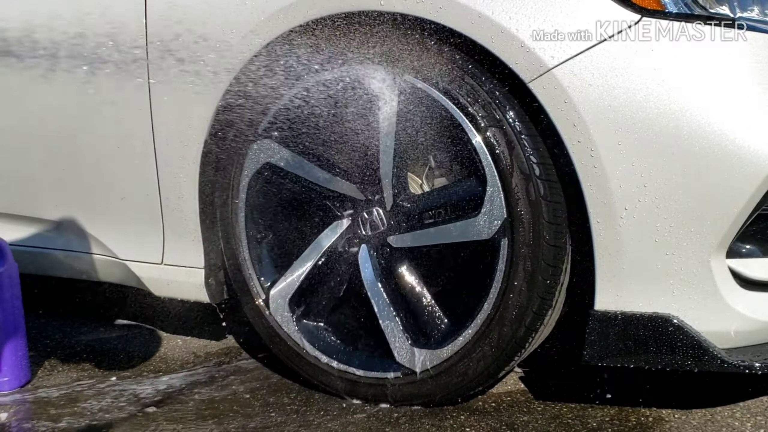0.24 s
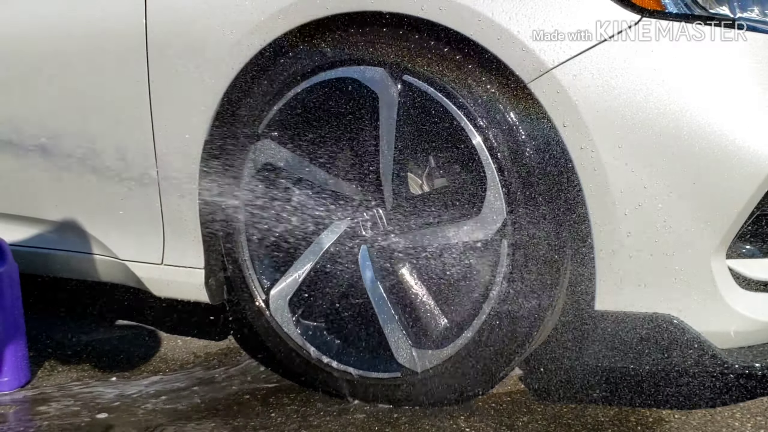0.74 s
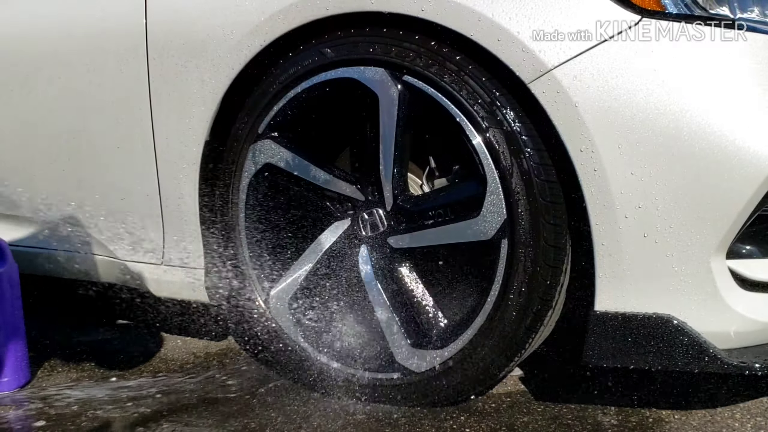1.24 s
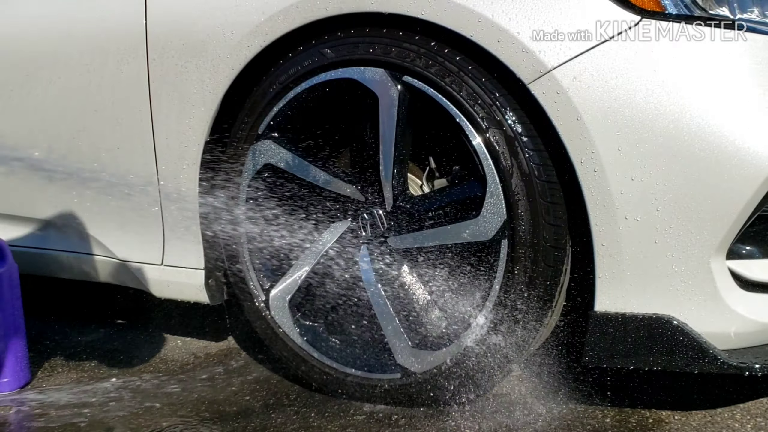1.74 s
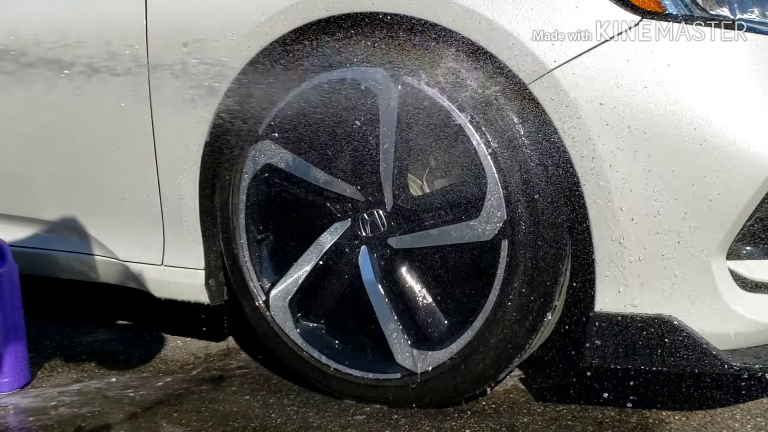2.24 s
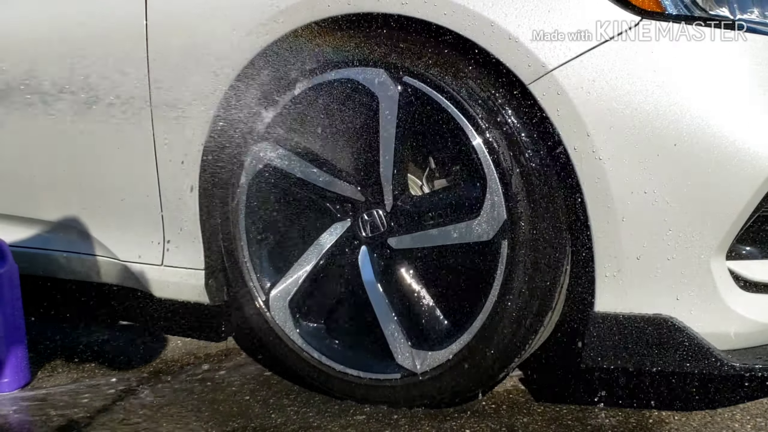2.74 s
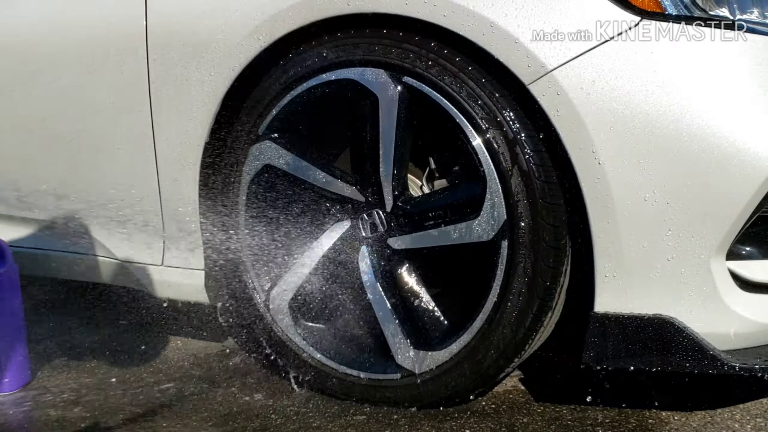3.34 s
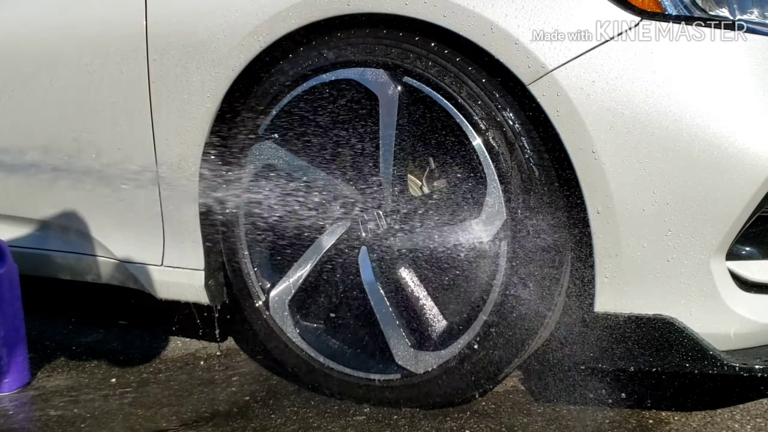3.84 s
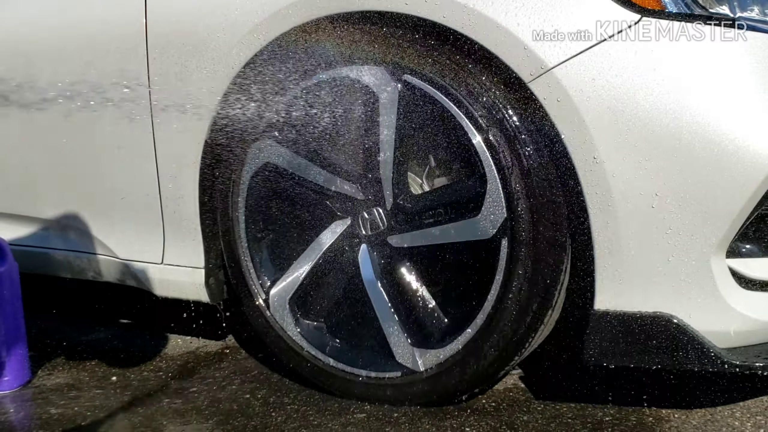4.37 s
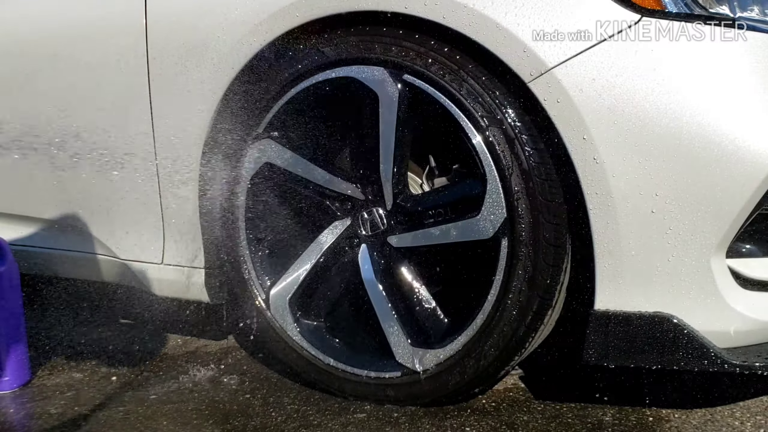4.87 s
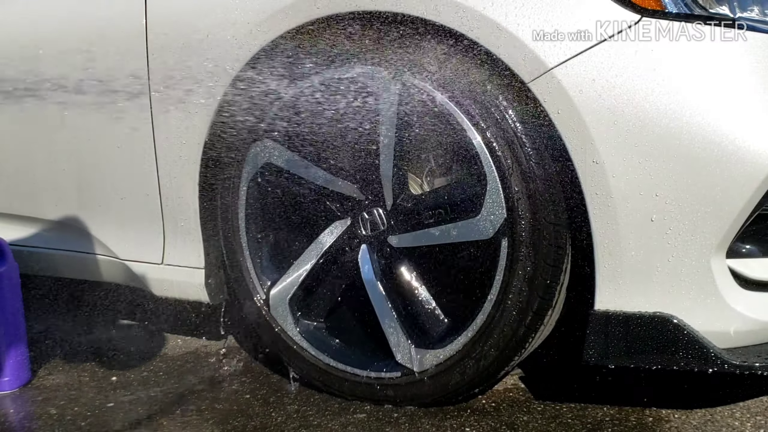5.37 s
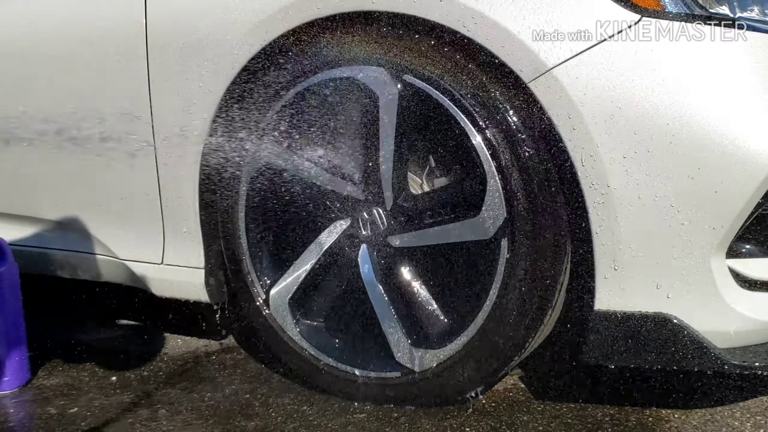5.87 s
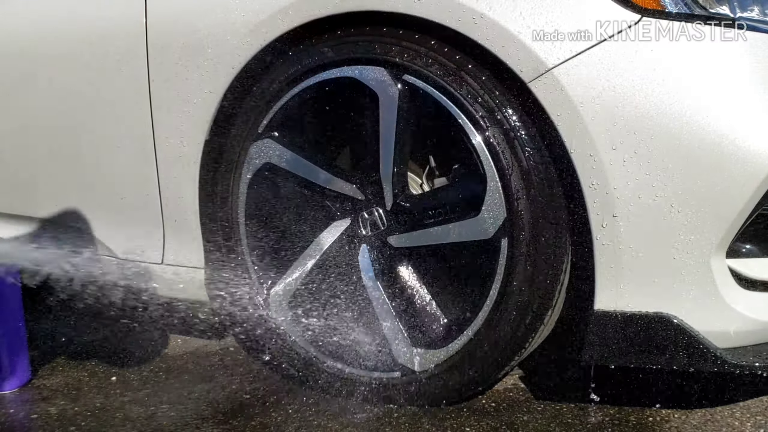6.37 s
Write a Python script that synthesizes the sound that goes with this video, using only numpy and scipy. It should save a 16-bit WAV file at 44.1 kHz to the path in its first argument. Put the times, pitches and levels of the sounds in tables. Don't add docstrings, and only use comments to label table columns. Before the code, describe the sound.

A garden hose hisses steadily over a car wheel outdoors, its nozzle spitting loud ragged bursts with thuds until about halfway, then just bright spray.

```python
import sys
import numpy as np
from scipy import signal
from scipy.fft import rfft, irfft, next_fast_len
from scipy.io import wavfile
from scipy.ndimage import uniform_filter1d, map_coordinates

SR = 44100
rng = np.random.default_rng(int(sys.argv[2]) if len(sys.argv) > 2 else 0)


def unload_wav(signal):
    wavfile.write(
        sys.argv[1],
        SR,
        np.round(np.clip(np.atleast_2d(signal).T, -1, 1) * 32767).astype(np.int16),
    )


def linear_from_db(decibels):
    return 10 ** (np.asarray(decibels, float) / 20)


N = 291497
SIZE = next_fast_len(N)
FREQ_HZ = np.fft.rfftfreq(SIZE, 1 / SR) + 1
T_S = np.arange(N) / SR

# t/s, spray level/dB, bare metal re spray/dB
JET = [(0, -36.5, -16.5), (.3, -38.5, -13), (.95, -40, -13), (1.16, -37.5, -13), (1.3, -40, -11.5),
       (1.5, -37.5, -16.5), (2.1, -37.5, -10.5), (2.5, -38, -13.5), (3.1, -39.5, -12.5), (3.36, -41.5, -12),
       (3.6, -37, -13), (3.82, -41, -11.5), (4.0, -39, -12.5), (4.4, -40.5, -12.5), (4.75, -37, -13),
       (5.1, -33, -16), (5.75, -36.5, -10.5), (6.61, -38.5, -11.5)]
# t/s, right port delay/samples
AIM = [(.15, 3.2), (.3, 0), (.65, -2), (1, 0), (1.65, .8), (2.0, -4), (2.4, -.2), (2.8, 4), (3.2, 4.5),
       (3.55, .2), (3.95, -3), (4.3, -.3), (4.75, 4.5), (5.08, 4.5), (5.35, 0), (5.8, -3.2), (6.07, 3.8),
       (6.4, 1)]
# t/s, drumming level/dB, half length/s, hiss lost/dB
CROSSINGS = [(0.135, -46, 0.038, -1.5), (0.5, -52.5, 0.058, 2), (0.592, -45, 0.04, -0.5),
             (0.73, -54.5, 0.071, -1.5), (0.88, -54, 0.059, 1), (1.935, -59, 0.053, 0),
             (2.07, -52.5, 0.2, -1), (2.743, -56, 0.023, -2), (3.02, -56.5, 0.047, 1.5),
             (3.19, -54.5, 0.063, -1), (3.493, -58, 0.04, 1.5), (3.93, -53.5, 0.034, 0.5),
             (4.208, -43.5, 0.056, 0.5), (4.565, -47, 0.074, 2.5), (4.985, -51, 0.1, 5.5),
             (5.22, -53.5, 0.087, 4), (5.613, -51.5, 0.27, -2), (5.883, -42.5, 0.018, 2),
             (5.994, -46, .03, -2), (6.22, -56, 0.23, -3), (6.518, -56, 0.08, -1.5)]
# t/s, hiss gained/dB, half length/s
SURGES = [
    (1.16, 0.5, 0.033),
    (1.477, 1.5, 0.042),
    (2.5, 1.5, 0.033),
    (3.963, 2, 0.054),
    (4.274, 4.5, 0.046),
    (4.632, 2.5, 0.13),
    (5.08, 2.5, 0.038),
    (5.752, 2.5, 0.039),
    (6.273, 1, 0.12),
    (6.52, 3.5, 0.031),
]
# f/Hz, density/dB
HISS_SPECTRUM = [(5400, -24), (5900, -3), (7000, -4.5), (7830, -2.5), (9200, -3), (12100, 3.5),
                 (14800, 2.5), (15400, 2), (17000, -0.5)]
# f/Hz, density/dB
RIM_SPECTRUM = [(1700, -8.5), (2300, -4.5), (2750, -1), (3300, -0.5), (4200, 0), (5000, -1), (5700, 0.5),
                (6300, -7.5)]
# f/Hz, density/dB
TYRE_SPECTRUM = [(120, -34), (200, -10.5), (567, -2), (720, -3), (843, -2), (977, -3), (1310, 1),
                 (1610, -0.5), (2090, -3.5), (3000, -8), (3900, -38), (6600, -120)]
TYRE_IDLE_DB, PAN_DB_PER_SAMPLE, SURGE_DB = -58.5, 0.3, 1.56

# t/s, peak/dB, open time/s, body re peak/dB, thud/dB
AIR_POCKETS = [
    (0, -28.5, 0.0041, 8.5, -52),
    (0.122, -16, 0.014, 0, -25.5),
    (1.353, -15, 0.045, 1.5, -27.5),
    (1.62, -16.5, 0.009, 0, -31.5),
    (1.956, -18, 0.0078, 3.5, -35),
    (2.147, -17.5, 0.011, 3, -48),
    (2.259, -18, 0.019, 3, -34),
    (2.57, -18, 0.0063, -1.5, -29),
    (2.812, -19.5, 0.0087, -0.5, -30.5),
    (3.245, -19, 0.0077, -2, -37),
]
# f/Hz, density/dB
SPIT_SPECTRUM = [(1290, -38), (2200, -14), (2550, -13.5), (3020, -10.5), (3920, -10), (5010, -7.5),
                 (5430, -12), (6040, -4), (6770, -8.5), (8030, -4), (10000, -4.5), (12100, 1.5),
                 (15400, -5.5)]
# f/Hz, density/dB
BODY_SPECTRUM = [(250, -12), (600, -1), (1000, -2), (1400, 0), (1900, -4.5), (2400, -8), (3000, 1)]
NOZZLE_LAG_SAMPLES, SPLAT_DB, SAG_DB_PER_S = 12.4, -26.5, 38

# t/s, peak/dB, half length/s
GUSTS = [(.27, -54, .05), (.59, -47.5, 0.082), (.92, -48, 0.2), (1.5, -57, 0.17), (2.0, -52, .08),
         (2.25, -54, 0.083), (3.9, -52.5, 0.1), (5.0, -51, 0.12), (5.42, -47, 0.18), (6.15, -49.5, 0.29),
         (6.34, -43.5, 0.084), (6.6, -48, .06)]
# f/Hz, density/dB
WIND_SPECTRUM = [(28, -14), (42, -4.5), (60, 2.5), (85, -2), (120, -7.5), (200, -20.5)]
# f/Hz, density/dB
TOWN_SPECTRUM = [(15, -41), (25, -24), (65, -9), (102, -3), (139, -3.5), (177, -2.5), (270, -8.5),
                 (328, -13.5), (386, -10), (461, -14.5), (1200, -13), (1560, -41), (2640, -120)]
# f/Hz, wander/Hz
MOTOR_LINES = [(130, 2.67), (115.5, 4)]
# t/s, upper line/dB, lower line/dB
MOTOR_LOAD = [(0, -57.5, -56), (.6, -55.5, -62), (.85, -52, -50.5), (1.6, -66, -52.5), (2.0, -52.5, -53.5),
              (2.6, -58, -58), (3.3, -59, -67), (4.9, -54, -79), (6.61, -65, -58.5)]
CALM_DB, TOWN_DB = -56, -55

# t/s, peak/dB
SLUGS = [
    (0.284, -35),
    (1.477, -31.5),
    (1.7, -35),
    (2.033, -31),
    (2.048, -36),
    (2.227, -31),
    (2.346, -31.5),
    (2.77, -31.5),
    (2.88, -32),
]
# t/s, peak/dB, f/Hz
DROPS = [(1.721, -26.5, 4850), (2.126, -41, 4490), (2.345, -39, 4700), (4.137, -37, 1380),
         (4.175, -35, 1280), (0.742, -42, 665), (5.236, -41, 980), (6.003, -38, 1090), (4.533, -29.5, 2350),
         (4.582, -33, 1030), (5.862, -34, 1390)]
# t/s, peak/dB, f/Hz
PUFFS = [
    (0.766, -31.5, 188),
    (4.335, -42, 61.9),
    (6.283, -27, 66.4),
    (6.353, -38, 95),
    (6.379, -38, 56.5),
]

# f/Hz, left minus right/dB
PORT_TILT = [(100, -0.5), (300, 0), (1000, 0.5), (4000, 0.5), (5300, -1.5), (6200, 0.5), (8000, 11.5),
             (9500, -1.5), (12000, 3.5), (15000, 1.5)]
# f/Hz, shared power/1
PORT_SHARE = [(60, 0.35), (150, 0.88), (400, 0.68), (900, 0.42), (2200, 0.23), (3300, 0.43), (5600, 0.39),
              (7000, 0.2), (15000, 0.17)]
TOP_HZ = 15760


def table(rows):
    hz, value = np.transpose(rows)
    return np.interp(np.log(FREQ_HZ), np.log(hz), value)


def curves(rows):
    t_s, *columns = np.transpose(rows)
    return [np.interp(T_S, t_s, column) for column in columns]


def shut(rows):
    below_oct = np.maximum(np.log2(rows[0][0] / FREQ_HZ), 0)
    above_oct = np.maximum(np.log2(FREQ_HZ / rows[-1][0]), 0)
    return linear_from_db(table(rows) - 24 * (below_oct + above_oct))


def unit(x):
    return x / np.sqrt(np.mean(x ** 2))


def walk(rate_hz):
    hold = int(SR / rate_hz)
    steps = np.repeat(rng.standard_normal(N // hold + 1), hold)
    return 0.74 * uniform_filter1d(uniform_filter1d(steps, hold), hold)[:N]


def bell(t_s, half_s):
    return np.exp(-((T_S - t_s) / half_s) ** 2)


def swells(rows, idle_db):
    power = linear_from_db(2 * idle_db) + sum(linear_from_db(2 * row[1]) * bell(row[0], row[2]) for row in rows)
    return np.sqrt(power)


def droplets(spread_db, lag, focus):
    size_db = spread_db * np.minimum(rng.exponential(size=(3, N)), 6)
    common, own_left, own_right = rng.standard_normal((3, N)) * linear_from_db(size_db)
    late = map_coordinates(common, [np.arange(N) - lag], order=3, mode="nearest")
    near, far, left, right = (rfft(unit(h), SIZE) for h in (common, late, own_left, own_right))
    share = np.clip(table(PORT_SHARE) * focus, 0, .95)
    return np.sqrt(share) * np.array([near, far]) + np.sqrt(1 - share) * np.array([left, right])


def patter(rows, spread_db, lag, focus, quick_db, rate_hz):
    spectrum = droplets(spread_db, lag, focus) * shut(rows)
    all_db = quick_db * walk(rate_hz)
    out = 0
    octaves = np.arange(np.log2(rows[-1][0] / rows[0][0]) + 1)
    for hz in rows[0][0] * 2. ** octaves:
        band = np.cos(np.pi / 2 * np.clip(np.log2(FREQ_HZ / hz), -1, 1)) ** 2
        flicker_db = all_db + 1.43 * quick_db * walk(1.5 * rate_hz)
        out = out + irfft(spectrum * band, SIZE)[:, :N] * linear_from_db(flicker_db)
    return unit(out)


def spray():
    jet_db, metal_db = curves(JET)
    lag, = curves(AIM)
    jet_db = jet_db + SURGE_DB * walk(14)
    jet_db = jet_db + sum(gain_db * bell(t_s, half_s) for t_s, gain_db, half_s in SURGES)
    hiss_db = jet_db - sum(lost_db * bell(t_s, half_s) for t_s, _, half_s, lost_db in CROSSINGS)
    hiss = patter(HISS_SPECTRUM, 2.8, lag, 1, 1.6, 55) * linear_from_db(hiss_db + 2.5)
    rim = patter(RIM_SPECTRUM, 2.4, lag, 1.3, 1.5, 35) * linear_from_db(jet_db + metal_db + 5)
    tyre = patter(TYRE_SPECTRUM, 3.3, lag, 1.2, 2.2, 60)
    tyre = tyre * swells(CROSSINGS, TYRE_IDLE_DB) * linear_from_db(1.5)
    pan_db = PAN_DB_PER_SAMPLE * lag
    return (hiss + rim) * linear_from_db(np.array([pan_db, -pan_db]) / 2) + tyre


def spits(rise_s=0.0041, close_s=0.008, hang_s=0.048, body_db=-20.5):
    air, body, splat, thud = np.zeros((4, N))
    for t_s, peak_db, open_s, tone_db, thud_db in AIR_POCKETS:
        k = slice(max(int((t_s - .04) * SR), 0), int((t_s + .25) * SR))
        t = T_S[k] - t_s
        since = np.maximum(t, 0)
        rise = np.minimum(t, 0) / rise_s
        shutting = np.maximum(t - open_s, 0)
        gate = np.exp(rise - shutting / close_s)
        air[k] += linear_from_db(peak_db - 1.5 - SAG_DB_PER_S * since) * gate
        body[k] += linear_from_db(peak_db + tone_db + body_db) * gate * (t > -.001)
        splat[k] += linear_from_db(SPLAT_DB) * np.exp(rise - (shutting / hang_s) ** 3)
        phase = 2 * np.pi * 140 * since / (1 + 30 * since)
        thud[k] -= linear_from_db(thud_db) * np.sin(phase) * np.exp(-since / 0.0017)
    side = linear_from_db(np.array([[1.5], [-1.5]]))
    burst = patter(SPIT_SPECTRUM, 2.5, NOZZLE_LAG_SAMPLES, 1.4, 1.8, 130) * air
    burst = burst + patter(BODY_SPECTRUM, 2.2, NOZZLE_LAG_SAMPLES, 1.2, 1.5, 150) * body
    spatter = patter(SPIT_SPECTRUM, 2.5, NOZZLE_LAG_SAMPLES, 1.1, 2, 90) * splat
    return side * burst + side ** 0.35 * spatter + side ** 7.9 * thud


def outdoors():
    wind = patter(WIND_SPECTRUM, 0, 0, 1.0, 1.6, 9.7) * swells(GUSTS, CALM_DB) * linear_from_db(3.5)
    town = patter(TOWN_SPECTRUM, 0, 0, 1.0, 3.1, 6) * linear_from_db(TOWN_DB)
    out = wind + town
    for (hz, wander_hz), line_db in zip(MOTOR_LINES, curves(MOTOR_LOAD)):
        phase = 2 * np.pi * np.cumsum(hz + wander_hz * walk(5)) / SR
        port_phase = 0.52 * np.array([walk(9), walk(9)])
        out = out + np.sin(phase + port_phase) * linear_from_db(line_db + 3 + 3.6 * walk(7.8))
    return out


def slugs(tail_s=0.013):
    gate = 0
    for t_s, peak_db in SLUGS:
        gate = gate + linear_from_db(peak_db) * (T_S > t_s) * np.exp(-np.maximum(T_S - t_s, 0) / tail_s)
    lag, = curves(AIM)
    return patter(SPIT_SPECTRUM, 4.5, lag, 1.5, 2, 150) * gate


def drops(cycles=4.3):
    out = np.zeros(N + 4000)
    t = np.arange(4000) / SR
    for t_s, peak_db, hz in DROPS:
        start = int(t_s * SR)
        out[start:start + len(t)] -= linear_from_db(peak_db) * np.sin(2 * np.pi * hz * t) * np.exp(-t * hz / cycles)
    return out[:N]


def puffs(cycles=0.5):
    out = np.zeros(N)
    for t_s, peak_db, hz in PUFFS:
        swing = hz * (T_S - t_s) - 1
        out -= linear_from_db(peak_db) * np.cos(2 * np.pi * swing - .6) * np.exp(-(swing / cycles) ** 2)
    return out * linear_from_db(np.array([[1.5], [-1.5]]))


def scene():
    return spray() + spits() + outdoors() + slugs() + drops() + puffs()


def low_pass(x):
    return signal.sosfilt(signal.butter(12, 16830, fs=SR, output="sos"), x)


def record(dry):
    rounded = .8 * np.tanh(dry / .8)
    tilt_db = table(PORT_TILT) / 2
    response = linear_from_db(np.array([tilt_db, -tilt_db])) * (FREQ_HZ < TOP_HZ)
    mix = irfft(rfft(rounded, SIZE) * response, SIZE)[:, :N]
    return low_pass(mix)


dry = scene()
out = record(dry)
unload_wav(out)
```